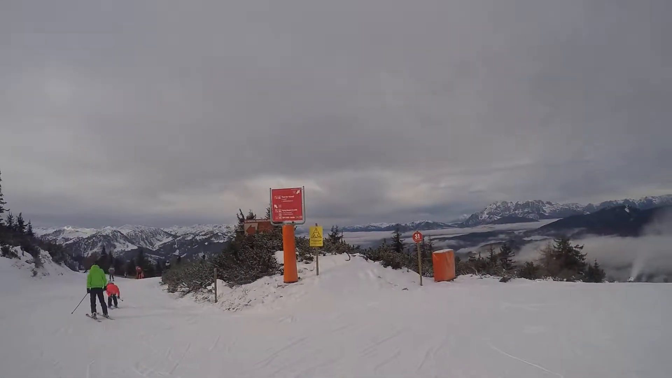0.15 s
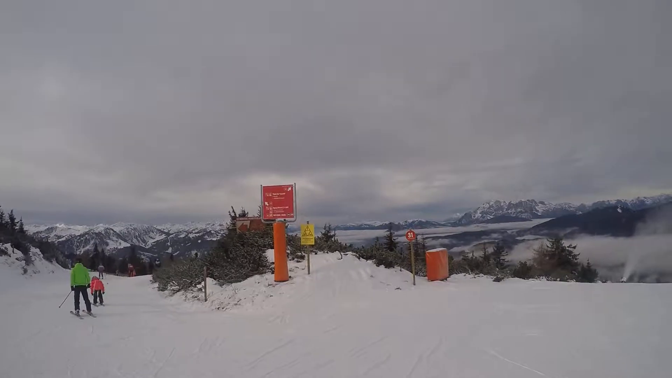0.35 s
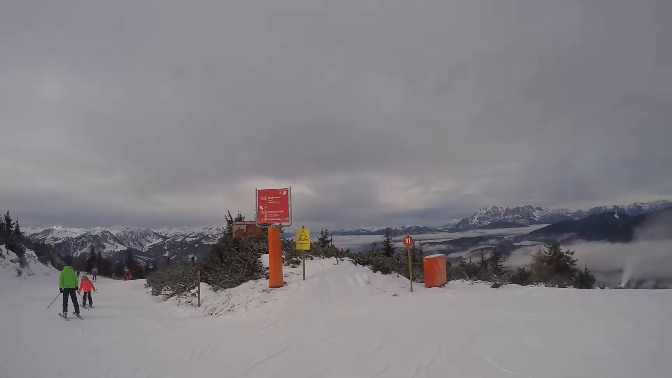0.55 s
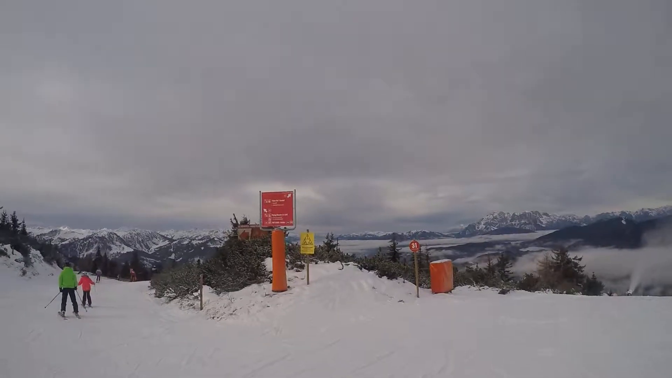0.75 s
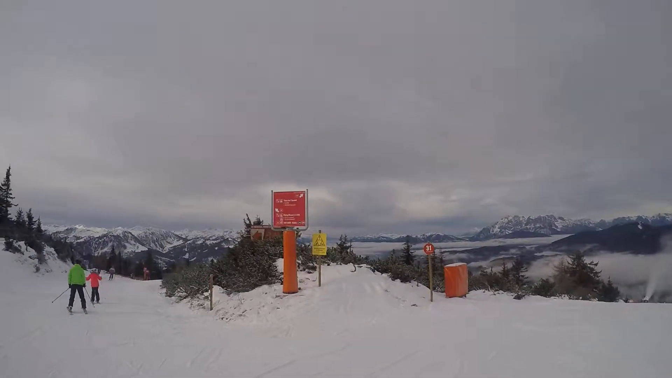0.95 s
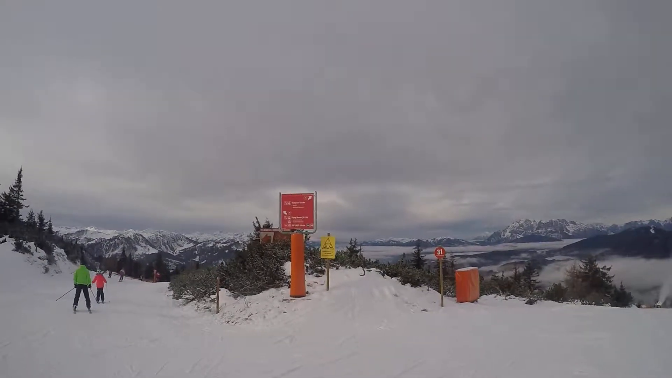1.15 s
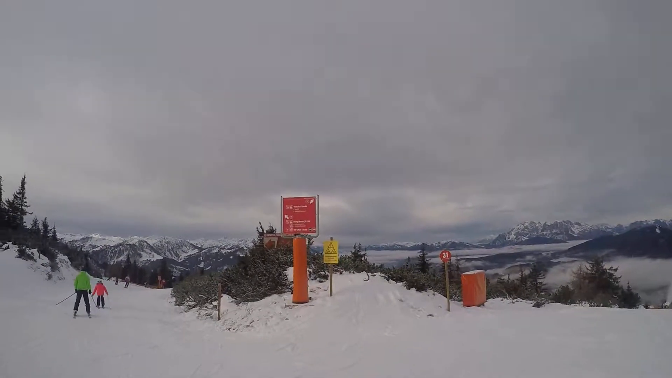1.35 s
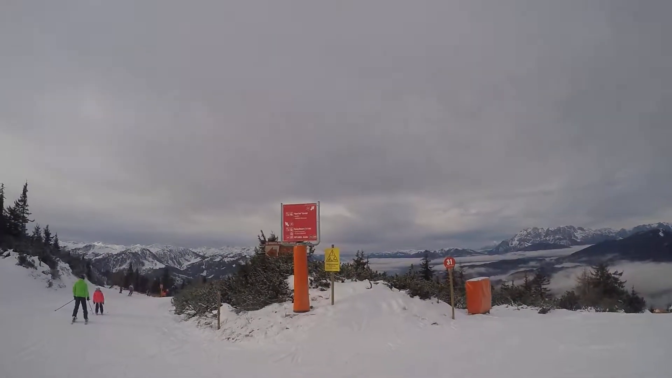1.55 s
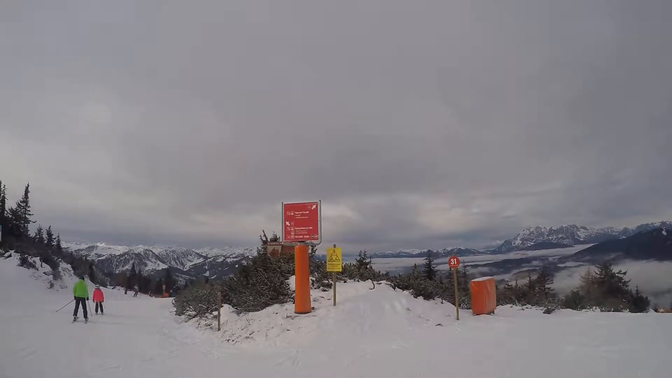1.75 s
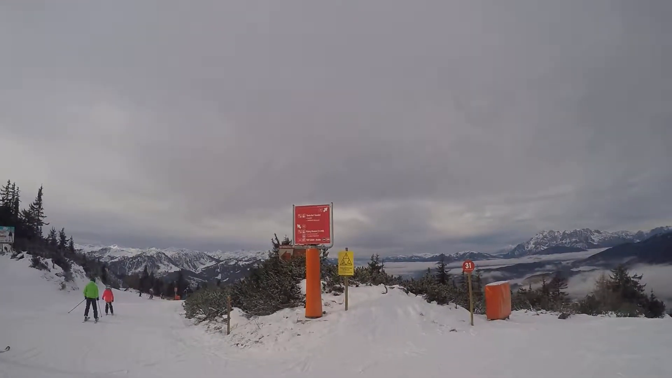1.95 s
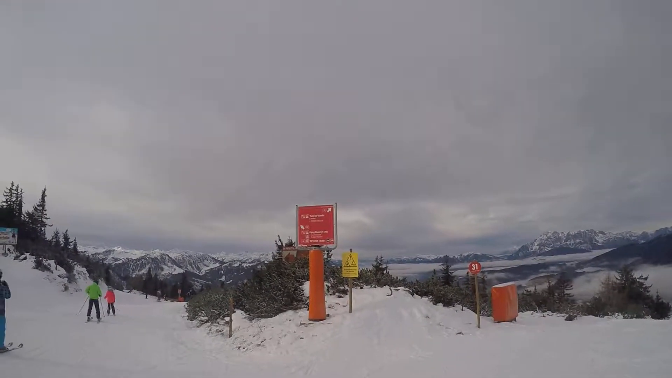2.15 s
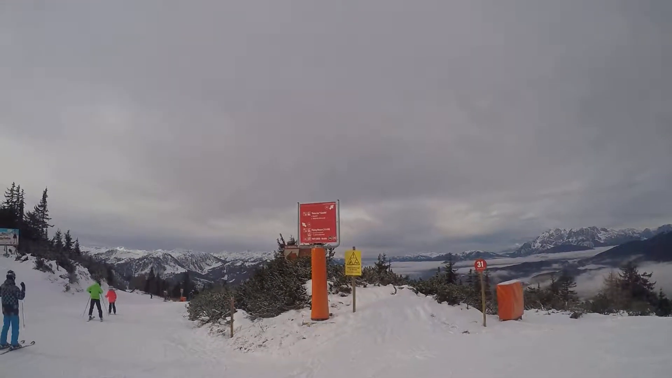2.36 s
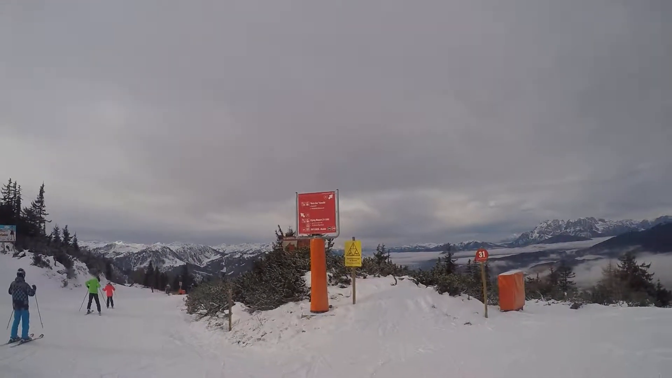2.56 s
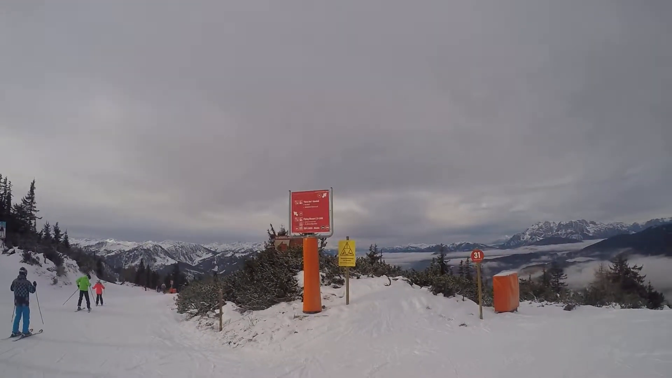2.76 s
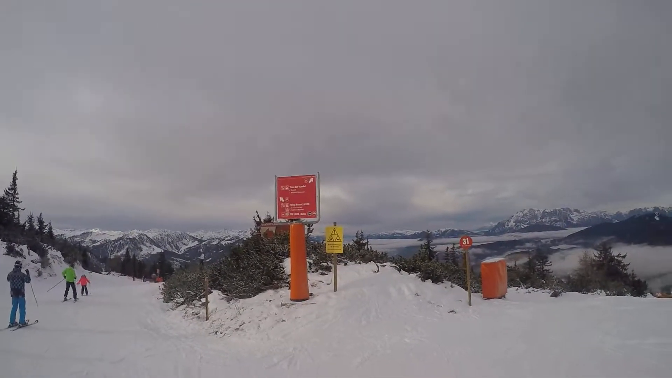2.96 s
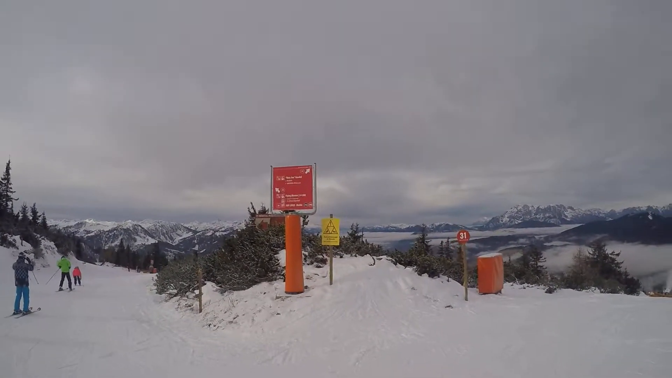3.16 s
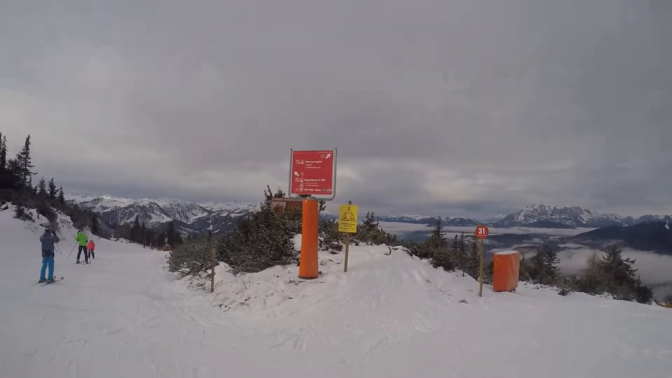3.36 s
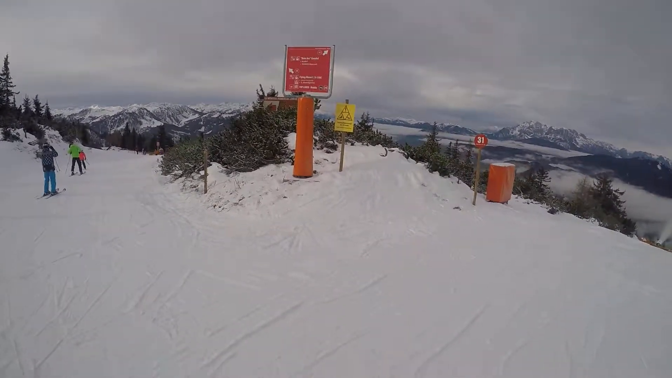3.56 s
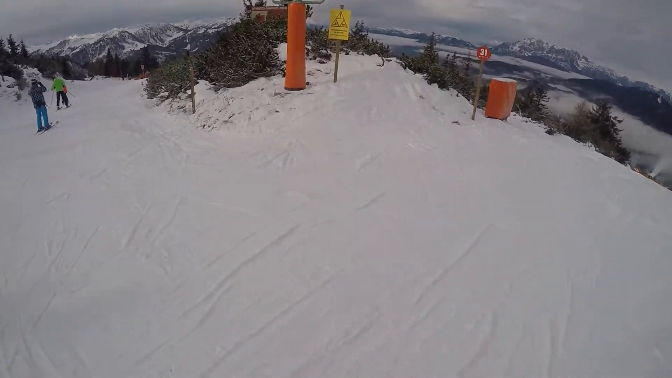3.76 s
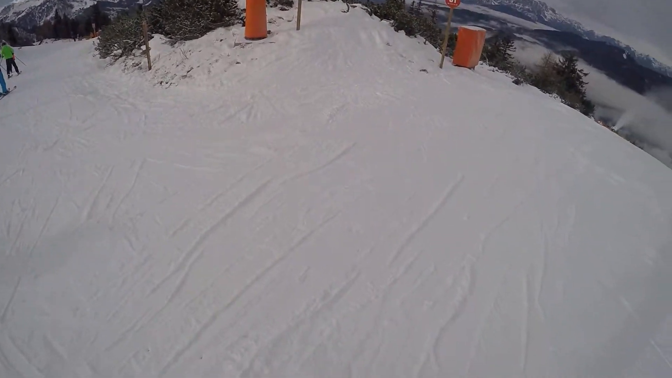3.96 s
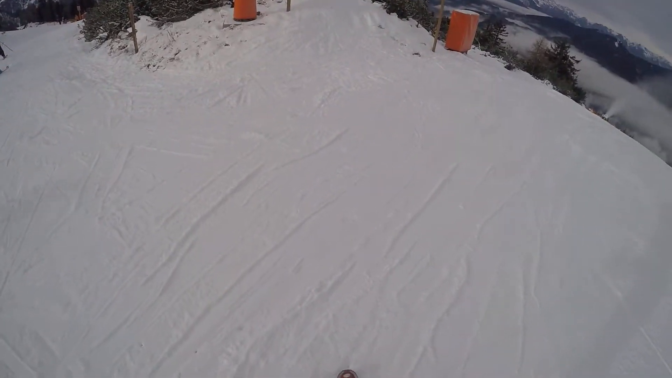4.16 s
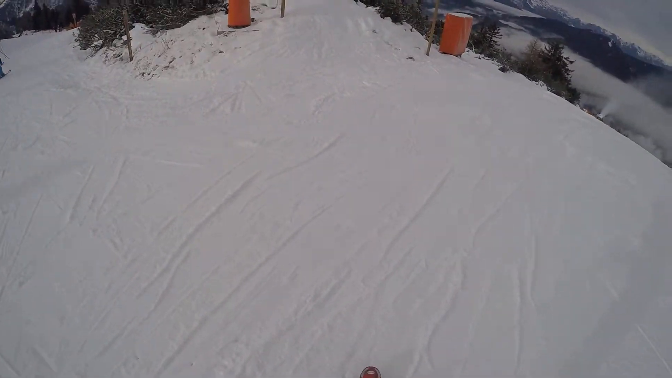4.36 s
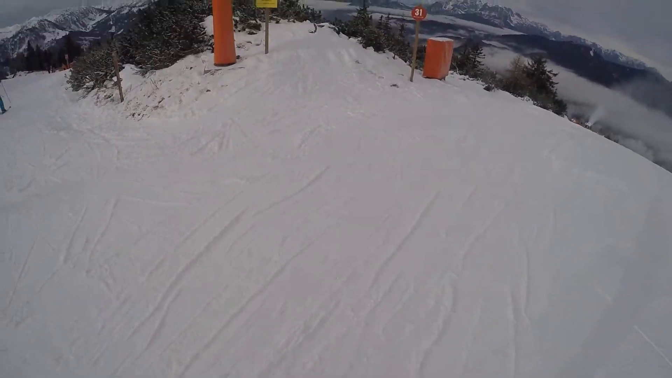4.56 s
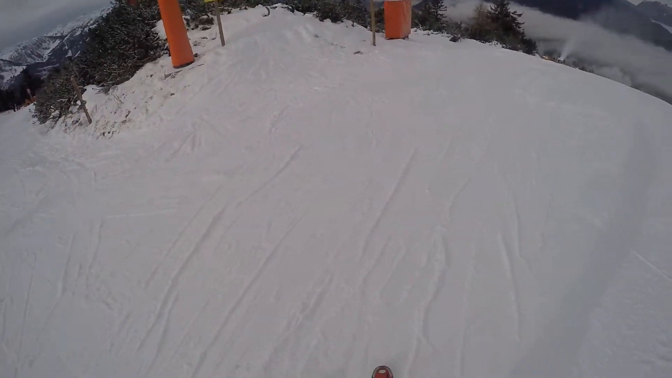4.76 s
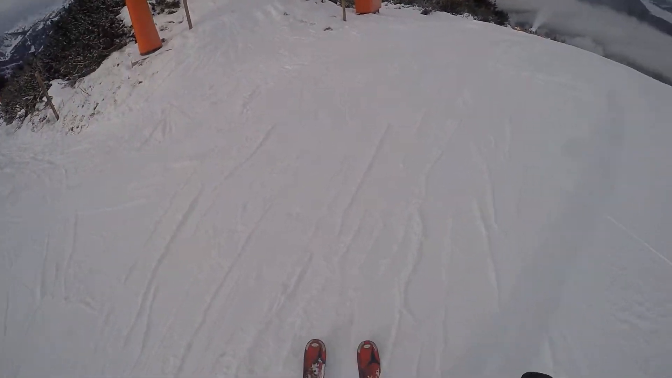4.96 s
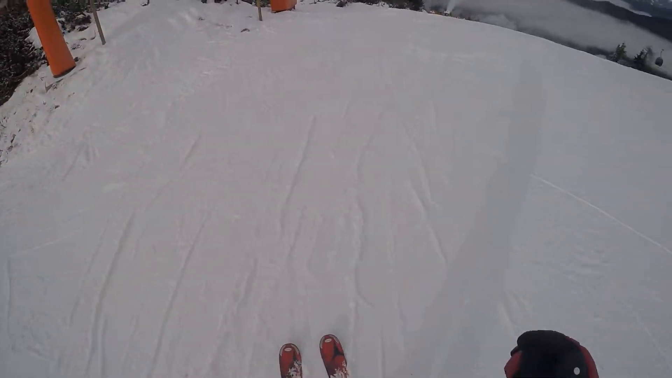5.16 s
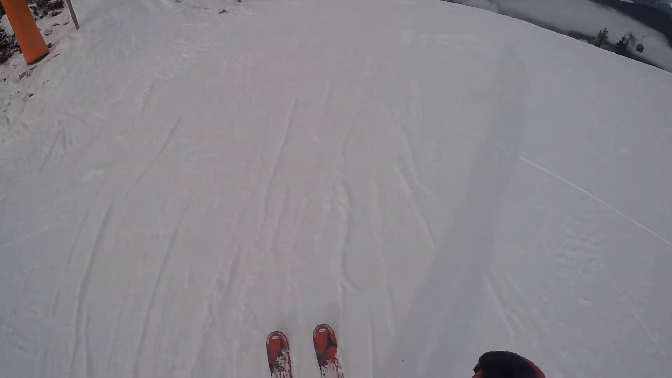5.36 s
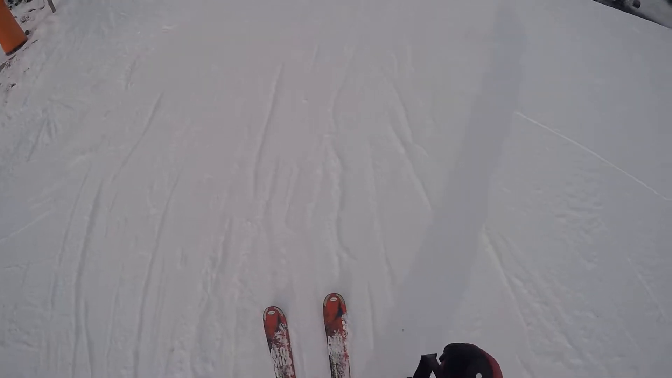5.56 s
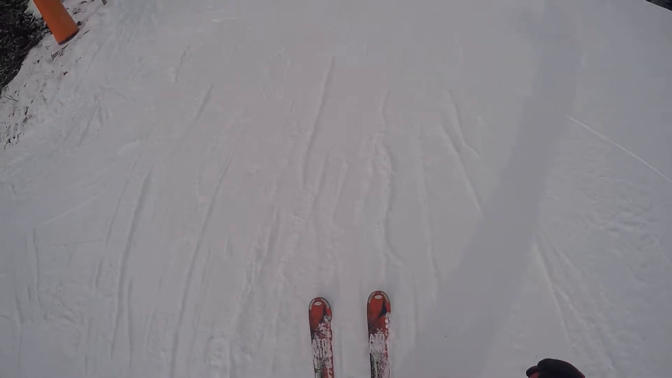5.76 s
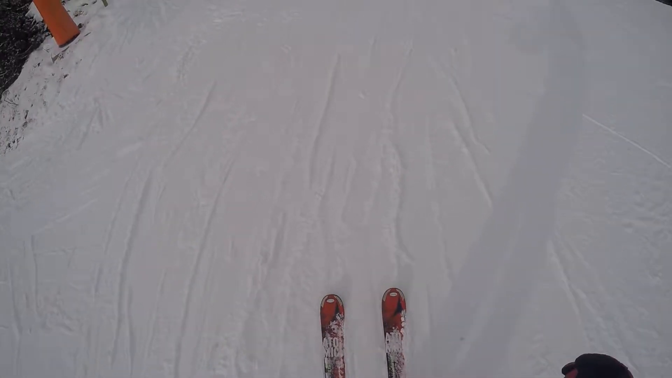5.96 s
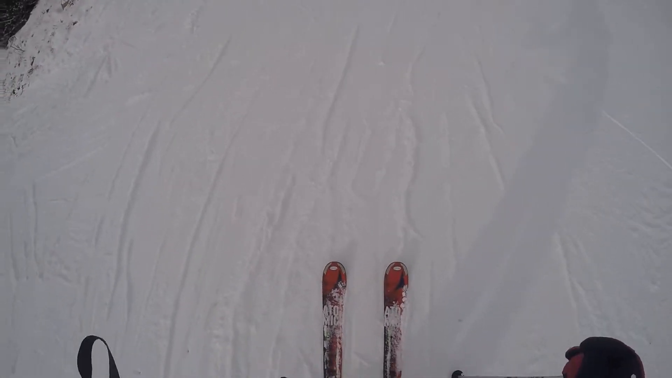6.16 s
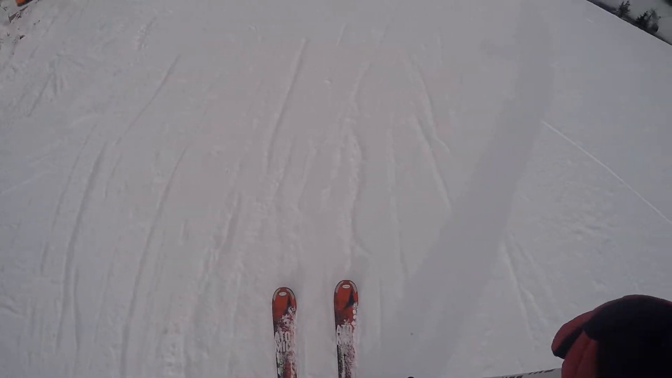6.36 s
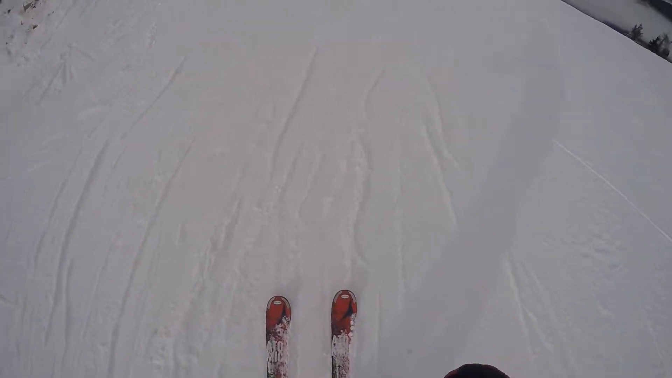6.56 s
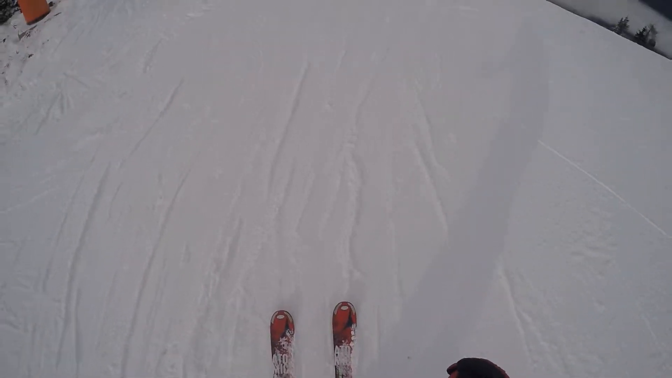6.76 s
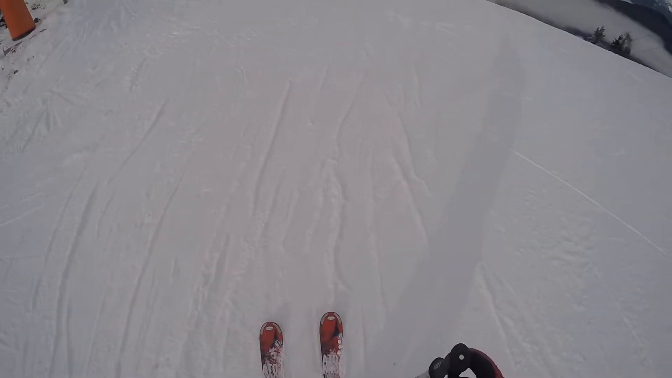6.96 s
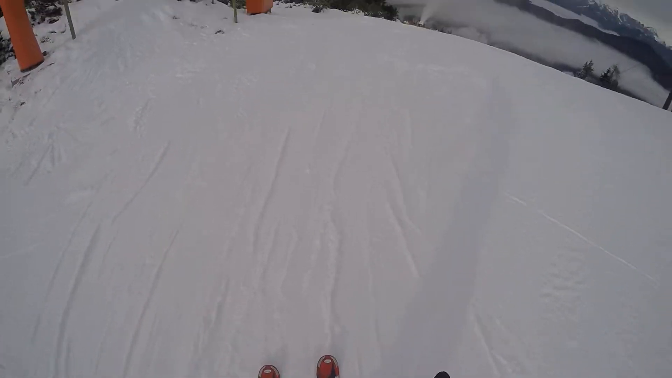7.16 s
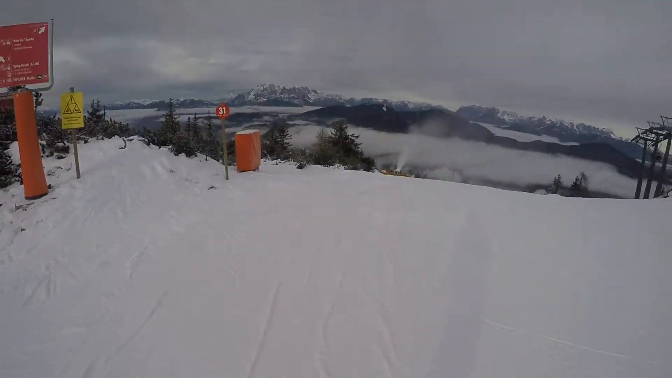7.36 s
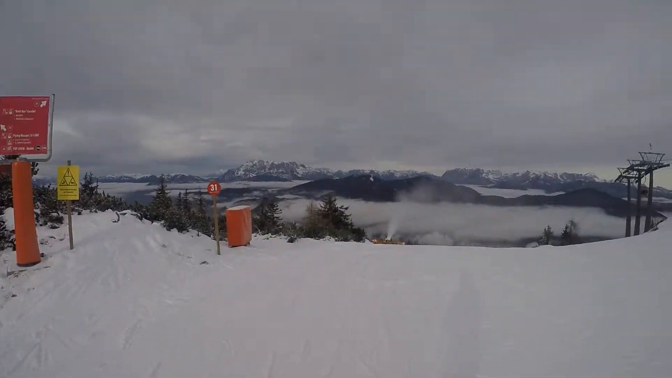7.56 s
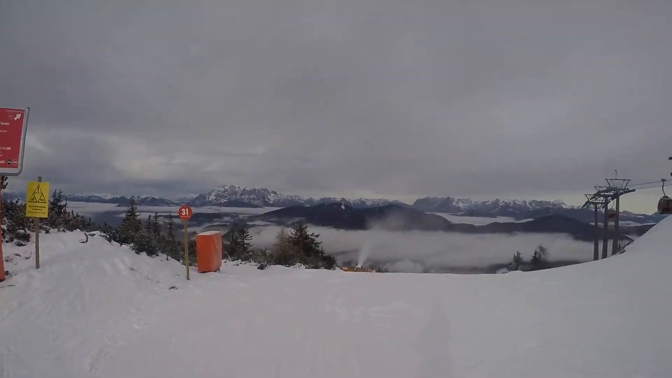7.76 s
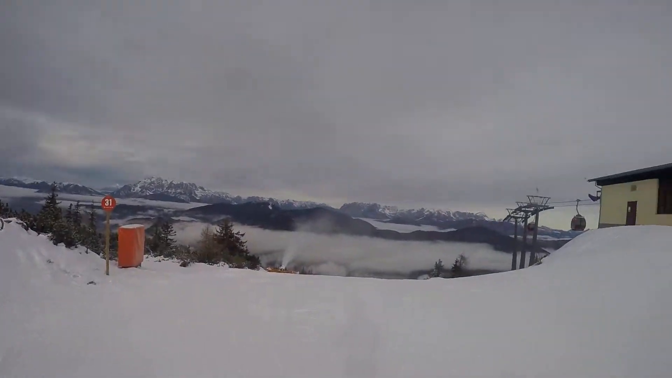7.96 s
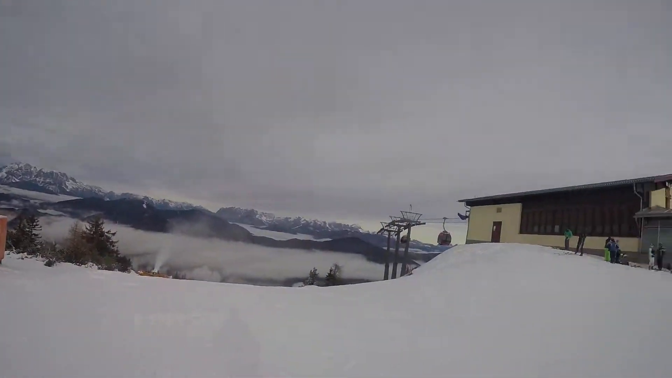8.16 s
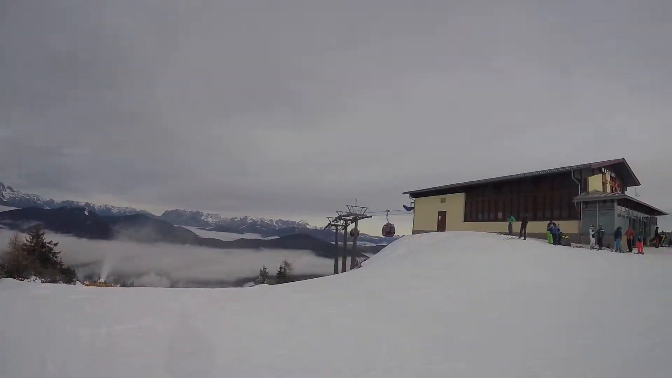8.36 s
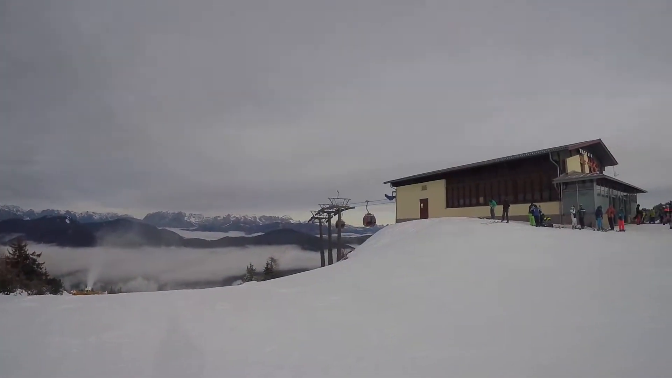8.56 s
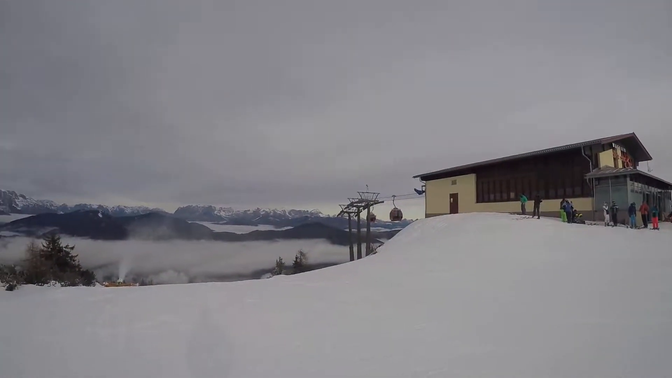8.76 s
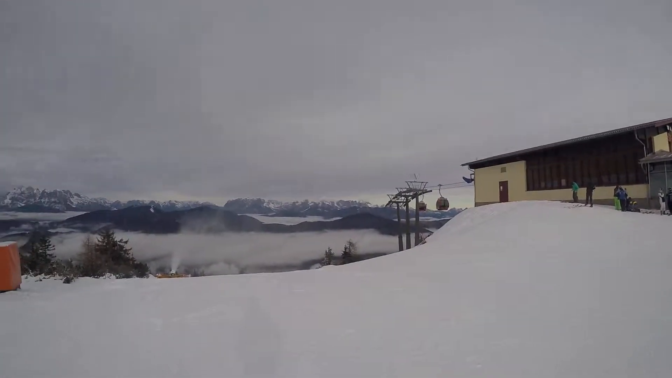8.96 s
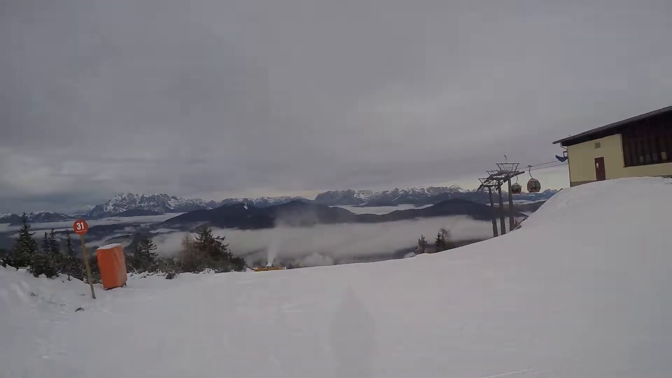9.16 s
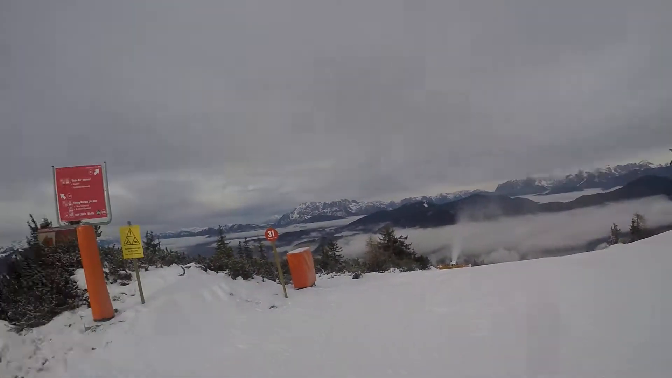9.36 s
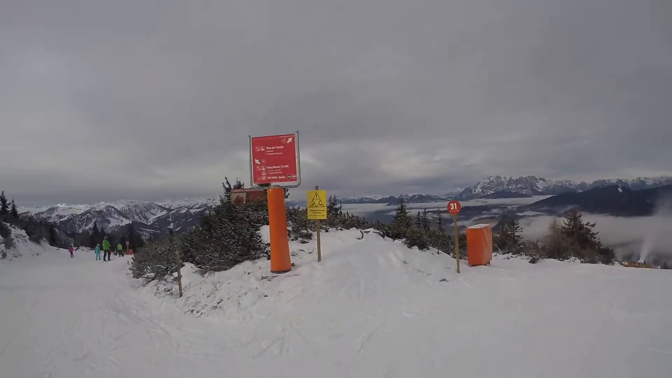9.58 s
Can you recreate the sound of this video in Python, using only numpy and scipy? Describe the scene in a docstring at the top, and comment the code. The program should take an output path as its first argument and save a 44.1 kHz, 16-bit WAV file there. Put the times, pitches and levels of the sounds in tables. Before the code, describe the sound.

Muffled gusts and far snow-gun hiss on a summit; a sharp clack on the casing midway, softer taps after, then a final airy rush.

```python
"""Wind on a summit drives the membrane of a microphone sealed in a case on a skier's helmet: noise bursts
rumble, ring the modes of mount and helmet, and rush round the shell. Three hard knocks excite decaying modes;
clothing or straps give short rasps of band noise; lurches of the head pump the membrane at low frequency.
Behind them far snow guns hiss and whine: noise through the resonances of the case, sliding noise bands and
wavering sines, coloured by where the head points, over a quiet floor of air and microphone hiss."""
import sys
import numpy as np
from scipy import signal
from scipy.fft import rfft, irfft
from scipy.io import wavfile
from scipy.ndimage import uniform_filter1d

SR = 44100
rng = np.random.default_rng(int(sys.argv[2]) if len(sys.argv) > 2 else 0)


def transcribe(u):
    """Save the signal u as a 16-bit wav file named by the first command-line argument.

    u: samples, shape (n,) or (channels, n), limited to [-1, 1]; the rate is SR.
    q: integer samples, one column per channel.
    """
    v = np.clip(np.atleast_2d(u).T, -1, 1)
    q = np.round(v * 32767).astype(np.int16)
    wavfile.write(sys.argv[1], SR, q)


N = 424286

# quiet air and microphone hiss: f/Hz, level/(dB per Hz)
FLOOR_SPECTRUM = [(60, -100), (130, -89), (250, -101), (500, -99.5), (900, -102), (1500, -100),
                  (3000, -103), (5500, -107), (8000, -111), (12000, -114), (15500, -117)]
# attitude of the head: t/s, looking down/(0-1), turned aside/(0-1), relative level of the far hiss/dB
HEAD_POSE = [(0, 0.2, 0.5, -1), (.5, 0.08, 0.54, -4), (1.1, 0.05, 0.03, 0), (1.9, 0.12, 0.07, -0.5),
             (2.3, 0.33, 0.12, -.5), (3.4, .39, 0.2, -1.5), (3.9, .64, 0, -1.5), (4.3, 1, 0, -5),
             (5.1, 0.73, 0, -0.5), (7.1, 1, 0.23, 1), (7.22, 0.2, 0, 0), (7.4, 0, 0.13, 1.5),
             (7.75, .05, .1, -3), (8.07, 0, 0, -1), (8.2, 0.03, 1, 2), (9.1, 0.32, .84, 0.5),
             (9.25, 0.4, 0, -2), (9.62, 0, .2, -3)]
# whine of the fans: f/Hz, level ahead/dB, level looking down/dB, level aside/dB
FAN_TONES = [(592, -76.5, -74.5, -71), (1187, -60.5, -76.5, -54.5), (1757, -66, -61, -67)]
# two bands of far hiss that slide as the head nods: t/s, lower f/Hz, level/dB, upper f/Hz, level/dB
SLIDING_BANDS = [(3.5, 3790, -108, 4800, -110), (3.85, 3560, -85, 4700, -86.5),
                 (4.6, 3464, -83, 4580, -104), (4.85, 3300, -88, 4100, -102), (5.1, 3080, -84.5, 4010, -90),
                 (5.4, 3050, -83, 3960, -87), (6, 2920, -86, 3895, -87), (6.9, 2920, -86, 4030, -89.5),
                 (7.15, 3020, -83.5, 4100, -87.5), (7.3, 3400, -82, 4100, -93),
                 (7.42, 3650, -85, 4200, -102), (7.6, 3570, -99, 4900, -102), (7.95, 3600, -89, 4930, -90),
                 (8.15, 3500, -100, 4940, -104), (8.2, 2874, -104, 3930, -106),
                 (8.35, 2850, -91, 3920, -88), (9, 2840, -86, 4000, -92), (9.3, 2820, -105, 3950, -108)]
# faint high band of far hiss, heard briefly near 5 s, gliding slightly down: t/s, f/Hz, level/dB
HIGH_SLIDING_BAND = [(4.5, 7650, -122), (4.75, 7650, -104), (5.1, 7500, -105), (5.35, 7400, -122)]
SLIDE_WIDTH_HZ = 280
# resonances of the case: f/Hz, width/Hz, relative levels/dB of far hiss ahead, down, aside, and of wind
CASE_RESONANCES = [(1203, 97, -77.5, -95.5, -83, -74), (1363, 175, -85.5, -88.5, -89, -81),
                   (1617, 174, -82.5, -86.5, -92, -72.5), (1788, 215, -85.5, -87.5, -95.5, -77),
                   (1996, 267, -84, -83, -88.5, -79.5), (2287, 227, -90, -82.5, -106, -88),
                   (2500, 400, -93, -101.5, -94, -80.5), (2855, 490, -95, -99, -93, -83.5),
                   (3500, 330, -101, -95, -97, -81), (4090, 260, -97, -97, -98, -99),
                   (4650, 550, -99, -99.5, -100.5, -83.5), (5135, 110, -100, -99, -96, -89.5),
                   (5930, 220, -105, -105, -101, -104), (6390, 230, -106, -106, -100, -105),
                   (7080, 320, -112, -110, -103, -112)]
# lurches of the head that pump the membrane: t/s, level/dB, swing f/Hz
HEAD_LURCHES = [(5.106, -15, 17.5), (6.028, -0.5, 27.5), (6.56, -9.5, 32.4)]
# rasps of clothing or straps: t/s, level of bright part/dB, dull part/dB, top part/dB, length/s
STRAP_RASPS = [(1.225, -63, -52, -75, 0.027), (1.78, -68, -62, -62, .018), (2.553, -66, -51, -64, .02),
               (2.7656, -54, -40, -61, 0.012), (3.185, -65, -64, -68, .012), (3.1906, -60, -60, -60, .015),
               (3.905, -53, -44, -74, 0.0048), (5.112, -61, -60, -67, 0.05),
               (5.4337, -45.5, -44.5, -54, 0.014), (5.9867, -47, -42, -53, 0.02),
               (6.442, -50, -44, -49, 0.021), (6.5198, -41.5, -42.5, -49, 0.02),
               (6.935, -56, -58, -73, 0.02), (9.588, -61, -50, -77, .012)]
# spectrum of the top part of a rasp: f/Hz, relative level/dB
RASP_TOP_SPECTRUM = [(4120, -18), (7000, -21), (8950, -15), (11400, -28), (13400, -19), (15300, -38)]
# modes of mount and helmet: f/Hz, t60/s, relative level struck/dB (from third row), in wind/dB (from second)
MOUNT_MODES = [(96.1, 0.19, 0, -30), (219.2, 0.24, 0, -6), (392, 0.052, 7, -10.5), (576, 0.036, 1.5, -15.5),
               (820, 0.036, 10, -14.5)]
# modes of the struck shell: f/Hz, t60/s, relative level/dB
SHELL_MODES = [(1040, 0.055, -20.5), (1337, 0.024, -8.5), (1520, 0.013, -3.5), (1590, 0.012, 0),
               (1830, 0.0097, -7.5), (1912, 0.13, -21), (2170, 0.026, -9.5), (2564, 0.035, -17.5),
               (2870, 0.017, -17), (3560, 0.007, -11), (4600, 0.011, -24.5), (5030, 0.0082, -23.5),
               (6540, 0.0073, -66), (9500, .004, -69)]
# contacts of the knocks: t/s, shell level/dB, hardness/(dB per octave), contact time at 1600 Hz/s,
# level of mount sway/dB, of thunk/dB, of higher mount modes/dB
KNOCK_CONTACTS = [(6.432, -4.5, -5.5, 0.0064, -20, -46, -36.5), (6.4429, -25, 9.5, 0.0023, -26, -67, -59),
                  (6.4457, -18.5, -5, 0.0048, -56, -60, -50), (6.6429, -22, 17, 0.00454, -20, -36, -40),
                  (7.4719, -25.5, 6.5, 0.0044, -26.5, -62, -45)]
MOUNT_LAG_S = 0.00506   # the heavy mount answers after the shell
# air rushing round the case: t/s, level of low shaking/dB, of higher shaking/dB, relative level in the case/dB
AIR_RUSH = [(0, -72, -71, -21), (.6, -77, -70.5, -14.5), (.95, -75, -69, -21.5), (1.2, -77, -66, -17),
            (1.55, -71, -61.5, -22), (1.7, -65, -60.5, -20), (2.1, -80, -70, -28), (3.2, -72, -70, -19),
            (3.64, -70, -64.5, -19), (4.1, -76, -74.5, -14), (5.1, -73.5, -70.5, -19),
            (6.3, -83.5, -67, -21), (6.62, -64, -63.5, -15), (7.2, -86, -76, -23.5),
            (7.88, -65, -63.5, -10), (8.08, -64.5, -56, -8), (8.25, -64.5, -63, -20),
            (8.75, -76, -74.5, -19.5), (9.18, -70.5, -65, -12.5), (9.3, -67, -56, -9.5),
            (9.36, -66, -59, 1.5), (9.43, -66.5, -56.5, 0), (9.5, -65, -61, -10.5), (9.55, -65, -66, -16),
            (9.62, -74, -67, -32)]
# spectrum of wind pressure on the membrane: f/Hz, relative level/dB
RUMBLE_SPECTRUM = [(3.5, -42), (6.0, 9.5), (22, 3.5), (35, 2), (59, -6.5), (100, -13.5), (115, -32),
                   (131, -34), (200, -60), (260, -39), (440, -120)]
# gusts on the microphone: start t/s, length/s, relative rumble level/dB
WIND_GUSTS = [(.25, 0.6, -37), (.98, 0.85, -41), (1.64, .36, -34), (2.05, 0.6, -39), (3.0, 0.4, -37),
              (3.53, 0.18, -40.5), (4.25, 0.32, -35.5), (4.82, 0.087, -46), (5.07, 0.33, -45),
              (5.4, .17, -36), (6.0, 0.16, -36.5), (6.45, 0.22, -29.5), (7.03, 0.37, -42),
              (7.75, 0.32, -43), (8.22, 0.28, -42), (9.05, 0.42, -61), (9.4, 0.29, -44)]
GUST_RISE_S, GUST_FALL_S, CALM_DB = 0.028, 0.061, -48.5
# shudders of the mount: start t/s, length/s, relative sway level/dB
MOUNT_SHUDDERS = [(0, .12, -43), (.95, 0.53, -50), (1.47, 0.26, -45.5), (1.83, 0.038, -56),
                  (2.15, 0.21, -48), (2.66, 0.034, -45.5), (3.47, 0.079, -41), (4.01, 0.044, -50.5),
                  (4.16, 0.027, -49), (4.55, 0.046, -63), (4.69, 0.029, -56), (4.85, .05, -54),
                  (6.19, 0.035, -41), (7.25, 0.11, -46), (7.65, 0.053, -52), (7.84, 0.24, -50),
                  (8.04, 0.08, -44), (8.17, 0.048, -36.5), (8.33, 0.12, -40.5), (9.22, 0.45, -47)]
SHUDDER_RISE_S, SHUDDER_FALL_S, STILL_DB, RESTLESS_DB = 0.015, 0.032, -59, 5.5
EVEN_S, EVEN_SHARE = 0.15, 0.46   # a gust pushes steadily: slower chance lumps are partly levelled
CUTOFF_HZ = 15360


def amp(db):
    """A level in dB is twenty times the logarithm of the amplitude ratio."""
    return 10 ** (np.asarray(db) / 20)


def in_time(rows):
    """Linear interpolation gives the columns of a time table at every sample."""
    s, *columns = np.transpose(rows)
    return [np.interp(np.arange(N) / SR, s, column) for column in columns]


def white():
    """White noise spreads its power evenly over frequency, here 0 dB per Hz."""
    return rng.standard_normal(N) * np.sqrt(SR / 2)


def rms_one(x):
    """Division by the root mean square normalises the mean power to 1."""
    return x / np.sqrt(np.mean(x ** 2))


def coloured(spectrum):
    """Weighting the Fourier components of white noise imposes a spectrum in dB per Hz."""
    hz, db = np.transpose(spectrum)
    grid_hz = np.maximum(np.arange(N // 2 + 1) * SR / N, 1)
    gain = amp(np.interp(np.log(grid_hz), np.log(hz), db))
    return irfft(rfft(white()) * gain, N)


def drift(rate_hz):
    """Linear interpolation between Gaussian knots is a slow random fluctuation of spread 1."""
    knots = rng.standard_normal(600)
    position = np.arange(N) / SR * rate_hz
    return np.interp(position, np.arange(600), knots) * np.sqrt(3 / 2)   # restores the interpolation loss


def filtered(x, order, hz, kind="low"):
    """A Butterworth filter passes its band with maximally flat gain."""
    return signal.sosfilt(signal.butter(order, hz, kind, fs=SR, output="sos"), x)


def band(x, hz, width_hz):
    """A band-pass of steep flanks selects the components about a centre frequency."""
    return filtered(x, 2, [hz - width_hz / 2, hz + width_hz / 2], "band")


def ring(x, hz, t60):
    """A damped resonator answers a unit impulse with a decaying sine of initial height 1."""
    r, w = amp(-60 / (t60 * SR)), 2 * np.pi * hz / SR
    return signal.lfilter([0, np.sin(w)], [1, -2 * r * np.cos(w), r * r], x + 1e-18)


def swells(rows, rise_s, fall_s, rest_db):
    """Independent bursts add in power: each rises linearly, holds and decays exponentially over a rest level."""
    t = np.arange(0, N, 16) / SR
    power = amp(rest_db) ** 2
    for s, length, db in rows:
        rise = np.clip((t - s) / rise_s + (s == 0), 0, 1)   # a burst at t = 0 is already up
        fall = np.exp(-np.maximum(t - s - length, 0) / fall_s)
        power = power + (amp(db) * rise * fall) ** 2
    return np.interp(np.arange(N) / SR, t, np.sqrt(power))


def by_pose(head, ahead_db, down_db, aside_db):
    """Directivity: the received level depends on the way the head points."""
    down, aside = np.clip(head[:2], 0, 1)
    return ahead_db + down * (down_db - ahead_db) + aside * (aside_db - ahead_db)


def floor_hiss():
    """Quiet air and microphone noise have a continuous spectrum whose level wavers slightly."""
    return amp(0.43 * drift(7.8)) * coloured(FLOOR_SPECTRUM)


def whine(head):
    """Tones of fan blades share a wavering pitch and fade independently on their way through moving air."""
    clock = np.cumsum(1 + .0012 * drift(3)) / SR
    out = 0
    for hz, *pose_db in FAN_TONES:
        fading_db = 1.0 * drift(5.2) + 1.85 * drift(1.435)
        out = out + amp(by_pose(head, *pose_db) + fading_db) * np.sin(2 * np.pi * hz * clock)
    return out


def sliding_bands():
    """Modulation principle: low-passed complex noise on a gliding carrier is a noise band that moves."""
    lower_hz, lower_db, upper_hz, upper_db = in_time(SLIDING_BANDS)
    out = 0
    for hz, db in (lower_hz, lower_db), (upper_hz, upper_db), in_time(HIGH_SLIDING_BAND):
        carrier = np.exp(2j * np.pi * np.cumsum(hz) / SR)
        envelope = filtered(white() + 1j * white(), 2, SLIDE_WIDTH_HZ / 2)
        out = out + amp(db) * np.real(carrier * envelope)
    return out


def case_hiss(head, air_db):
    """Incoherent sources add in power: far hiss and wind noise excite each resonance of the case together."""
    out, flutter, gusty = 0, drift(11.0), drift(25.0)
    for hz, width_hz, ahead_db, down_db, aside_db, wind_db in CASE_RESONANCES:
        patchy_db = .8 * drift(5)
        far_db = by_pose(head, ahead_db, down_db, aside_db) + head[2] + 0.37 * flutter + patchy_db
        near_db = wind_db + air_db + 2.7 * gusty
        out = out + np.hypot(amp(far_db), amp(near_db)) * band(white(), hz, width_hz)
    between = band(band(white(), 3400, 3500), 3200, 4000)   # broad rush between the peaks
    return out + amp(-88.5 + air_db + 1.7 * gusty) * between


def lurches():
    """A damped oscillation: the membrane is pulled one way, swings back and settles."""
    out = np.zeros(N)
    for s, db, hz in HEAD_LURCHES:
        at, turns = round(s * SR), np.arange(SR // 2) / SR * hz
        swing = np.sin(2 * np.pi * turns) * turns * np.exp(-2.2 * turns)
        out[at:at + SR // 2] -= amp(db) * swing
    return out


def rasps():
    """Friction makes noise bursts that start at once, sag and break off; the dull part sounds through the case."""
    levels = np.zeros((3, N + 4000))
    for s, *part_db, length in STRAP_RASPS:
        at, age = round(s * SR), np.arange(4000) / SR / length
        envelope = np.exp(-1.5 * age) * np.clip(4.5 - 4 * age, 0, 1)
        levels[:, at:at + 4000] += amp(part_db)[:, None] * envelope
    bright_level, dull_level, top_level = levels[:, :N]
    rasping = bright_level * rms_one(band(white(), 4770, 2040))
    rasping += dull_level * rms_one(band(white(), 1600, 1300))
    rasping += top_level * rms_one(coloured(RASP_TOP_SPECTRUM))
    return filtered(rasping + 1e-18, 4, 1100, "high")


def knocks():
    """Impact excitation: a contact chatters on the shell and shoves the mount; hardness tilts the mode levels."""
    shell, sway, thunk, shake = np.zeros((4, N))
    t = np.arange(8000) / SR
    for s, db, hardness, contact, sway_db, thunk_db, shake_db in KNOCK_CONTACTS:
        at = round(s * SR)
        for hz, t60, mode_db in SHELL_MODES:
            # higher modes feel only the first part of the touch
            press = np.sin(np.pi * np.minimum(t / contact * (hz / 1600) ** 0.32, 1))
            rung = ring(press * rng.standard_normal(8000), hz, t60)
            level_db = db + mode_db + hardness * np.log2(hz / 1600)
            shell[at:at + 8000] += amp(level_db) * rung / np.abs(rung).max()
        mount_at = at + round(MOUNT_LAG_S * SR)
        sway[mount_at] = amp(sway_db)
        thunk[mount_at] = amp(thunk_db)
        shake[at + round(contact * SR / 2)] = amp(shake_db)
    mount = ring(sway, *MOUNT_MODES[0][:2]) + ring(thunk, *MOUNT_MODES[1][:2])
    for hz, t60, struck_db, _ in MOUNT_MODES[2:]:
        mount += amp(struck_db) * ring(shake, hz, t60)
    through_case = filtered(filtered(shell + 1e-18, 8, 1130, "high"), 3, 6200)   # the case favours the middle
    return through_case + filtered(mount, 2, 1000)   # padding rounds off the shove


def rumble():
    """Turbulent pressure on the membrane is low-frequency noise whose level follows the gusts."""
    push = rms_one(coloured(RUMBLE_SPECTRUM))
    local_power = uniform_filter1d(push ** 2, round(EVEN_S * SR))
    push = rms_one(push / (local_power + .02) ** (EVEN_SHARE / 2))
    gusts = swells(WIND_GUSTS, GUST_RISE_S, GUST_FALL_S, CALM_DB)
    return gusts * amp(2.0 * drift(16.0)) * push


def shaking(low_db, high_db):
    """Random forcing of resonators: shudders sway the mount, rushing air shakes the higher modes and shell."""
    sway, second, *higher = [rms_one(ring(white(), hz, t60)) for hz, t60, *_ in MOUNT_MODES]
    shudders = swells(MOUNT_SHUDDERS, SHUDDER_RISE_S, SHUDDER_FALL_S, -94)
    rocking = np.hypot(shudders, amp(STILL_DB + RESTLESS_DB * drift(12.0)))
    sway = filtered(rocking * sway, 4, 125)   # too heavy for sudden starts
    low = amp(MOUNT_MODES[1][3]) * second + amp(-9.0) * rms_one(band(white(), 210, 200))
    high = amp(-7.5) * rms_one(band(white(), 506, 1000))
    for (*_, wind_db), mode in zip(MOUNT_MODES[2:], higher):
        high = high + amp(wind_db) * mode
    return sway + amp(2.44 * drift(17.0)) * (amp(low_db) * low + amp(high_db) * high)


def wind(low_db, high_db):
    """Superposition of direct pressure on the membrane and of vibration carried by mount and shell."""
    return rumble() + shaking(low_db, high_db)


def scene():
    """Linear superposition of far hiss, touches on the helmet and wind."""
    head = in_time(HEAD_POSE)
    low_db, high_db, air_db = in_time(AIR_RUSH)
    far = floor_hiss() + whine(head) + sliding_bands() + case_hiss(head, air_db)
    touches = lurches() + rasps() + knocks()
    return (far + touches + wind(low_db, high_db))[None]


def record(dry):
    """A steep elliptic low-pass removes the components above the cutoff."""
    return signal.sosfilt(signal.ellip(12, .5, 60, CUTOFF_HZ, fs=SR, output="sos"), dry)


dry = scene()
out = record(dry)
transcribe(out)
```